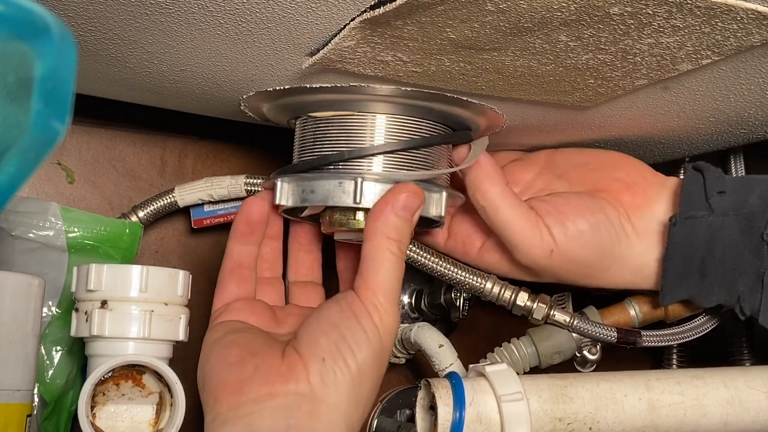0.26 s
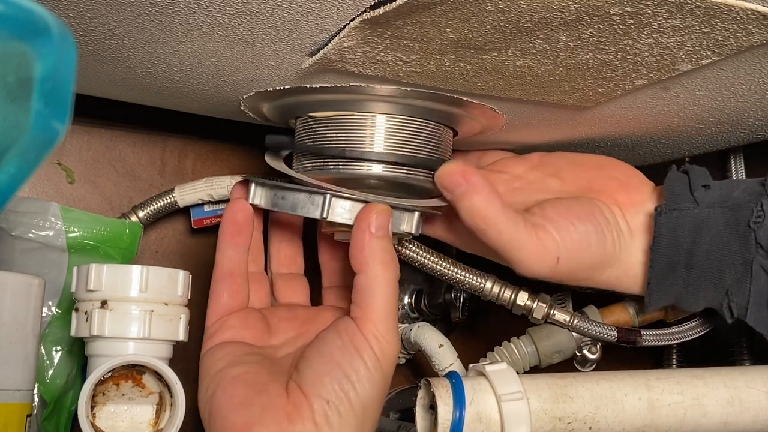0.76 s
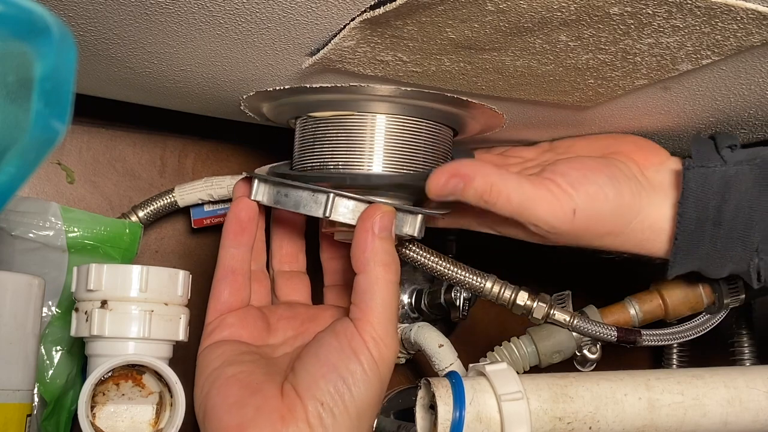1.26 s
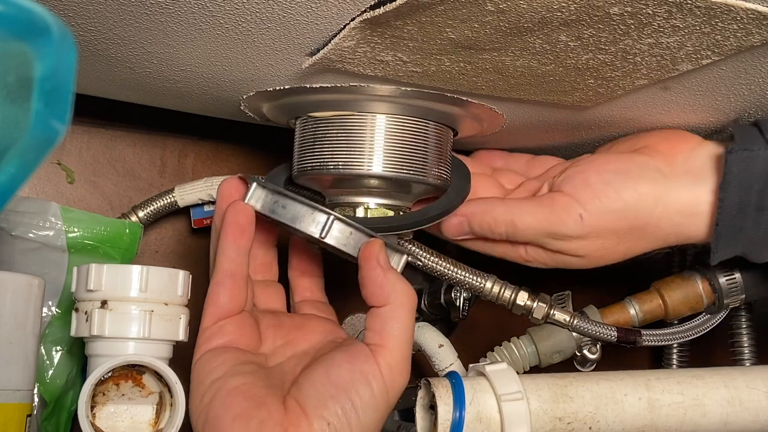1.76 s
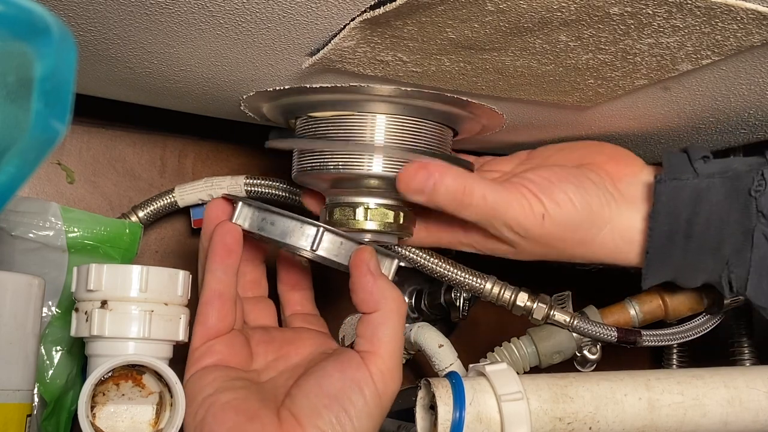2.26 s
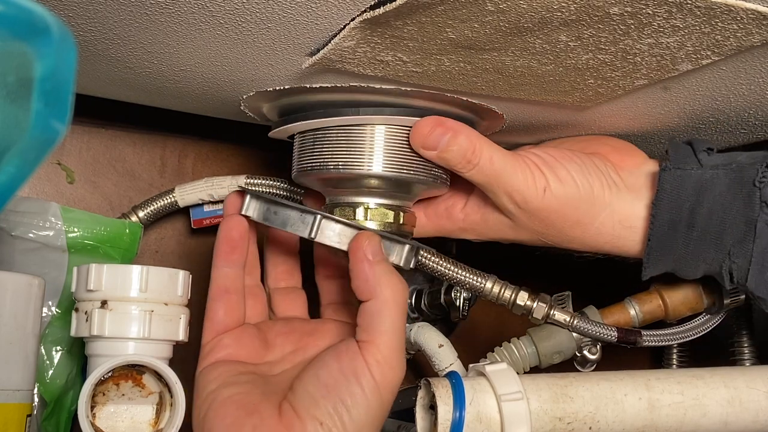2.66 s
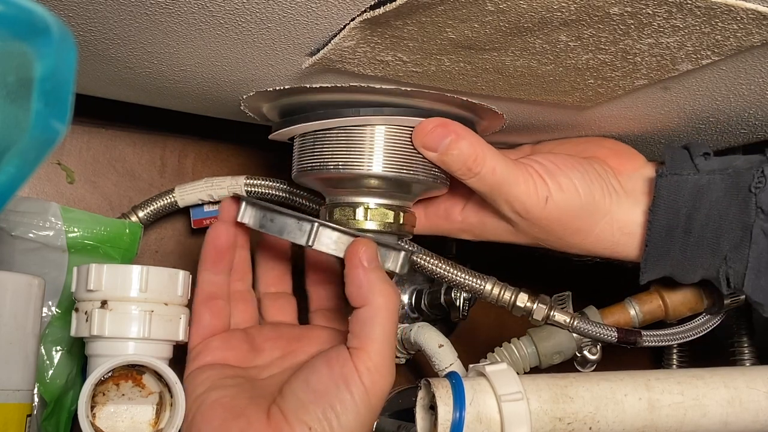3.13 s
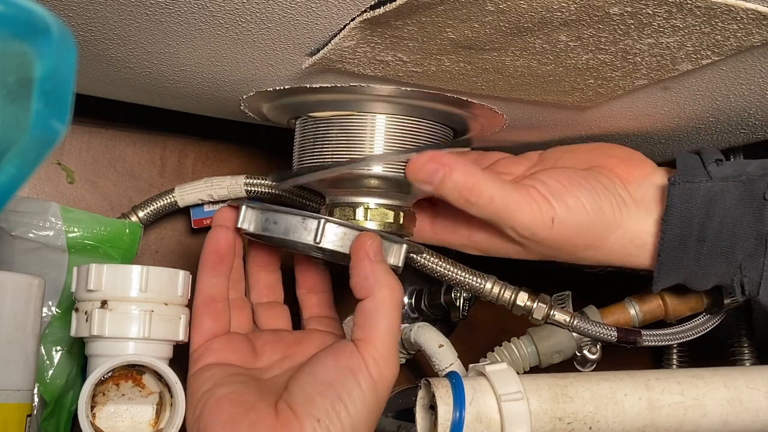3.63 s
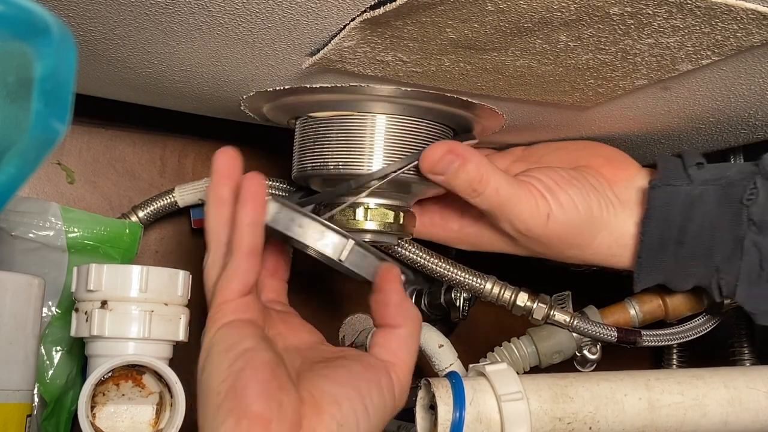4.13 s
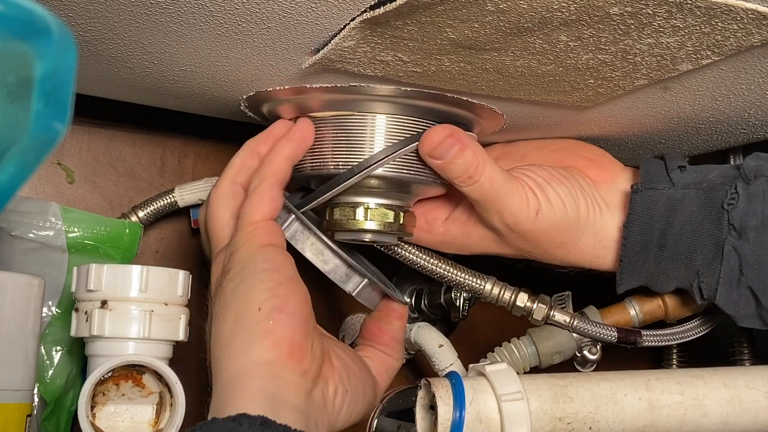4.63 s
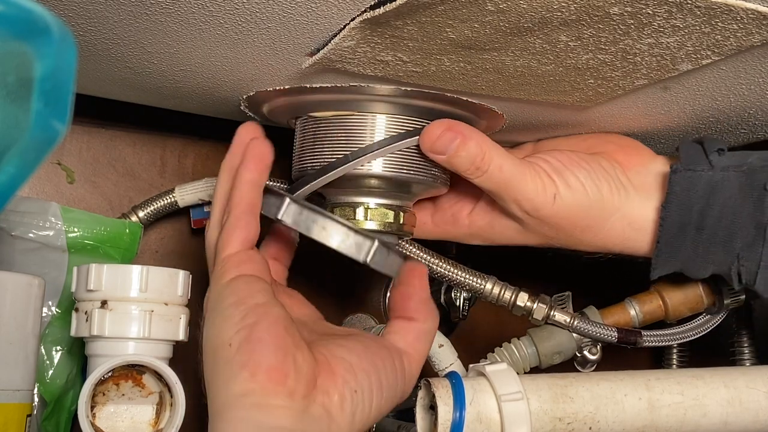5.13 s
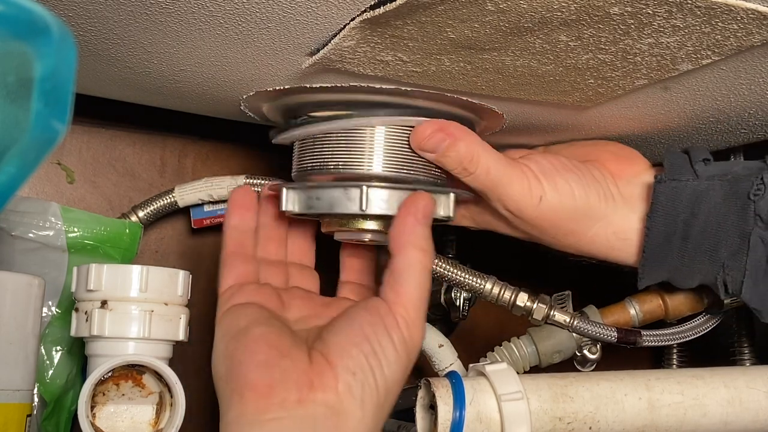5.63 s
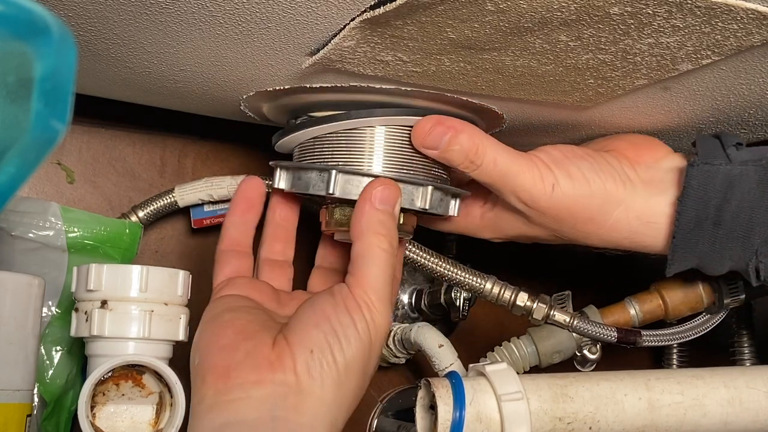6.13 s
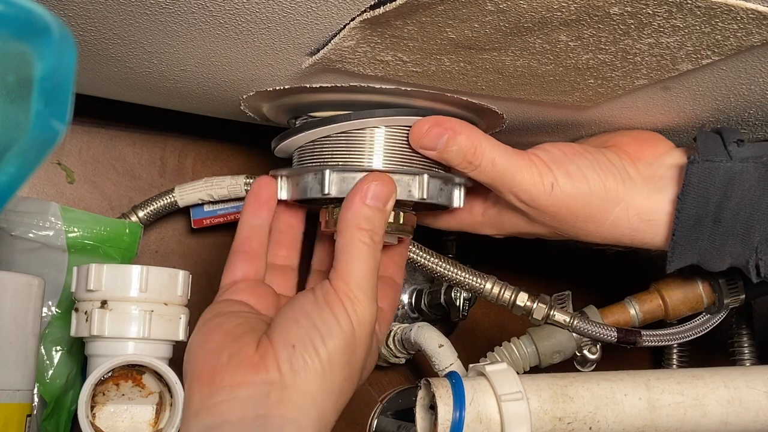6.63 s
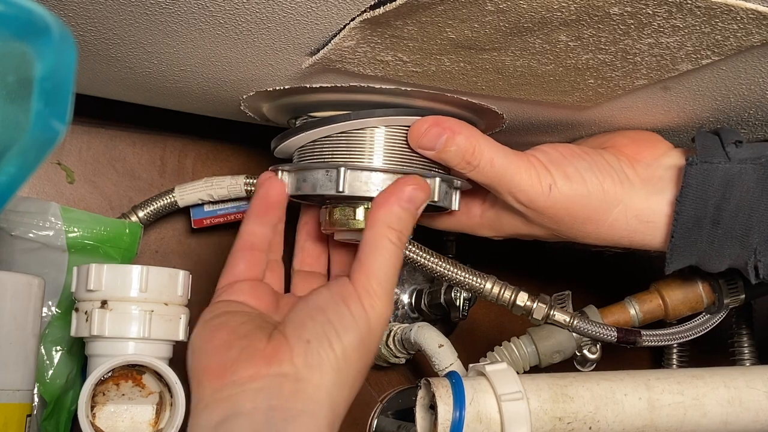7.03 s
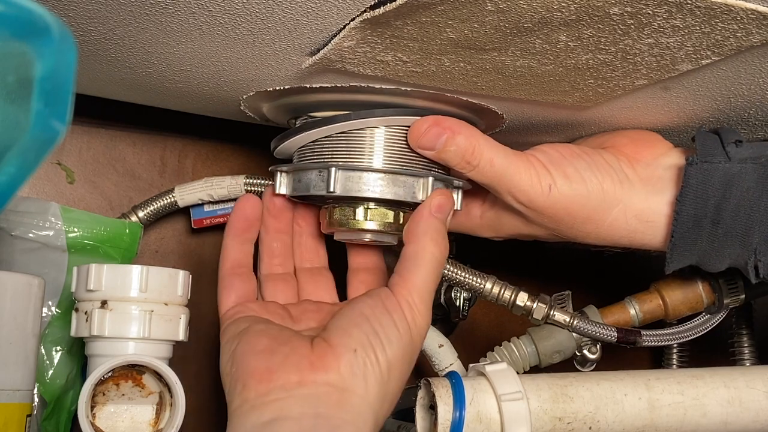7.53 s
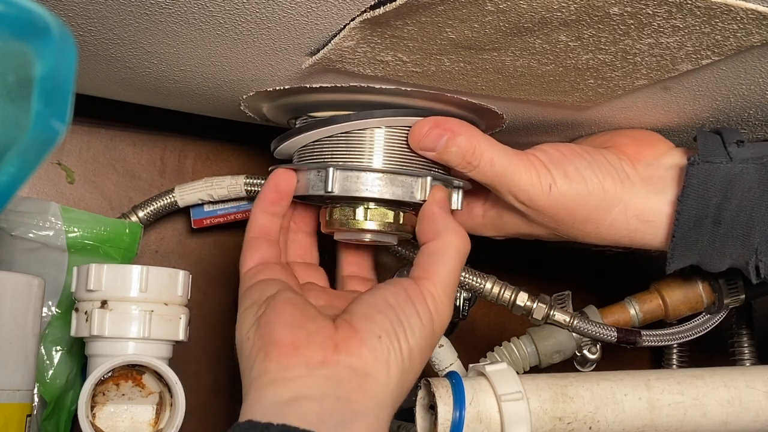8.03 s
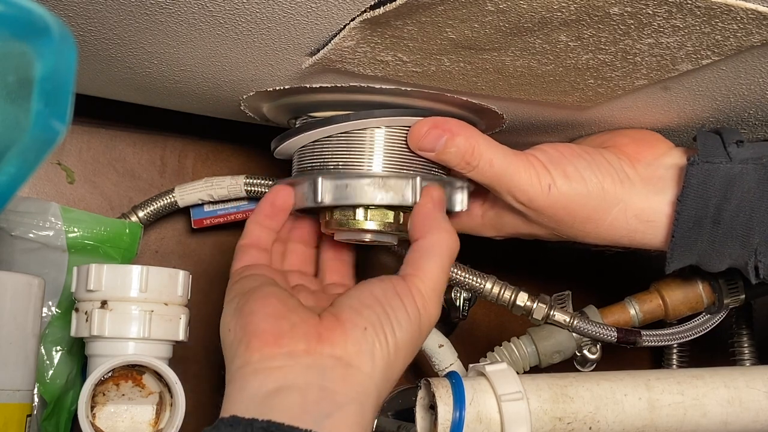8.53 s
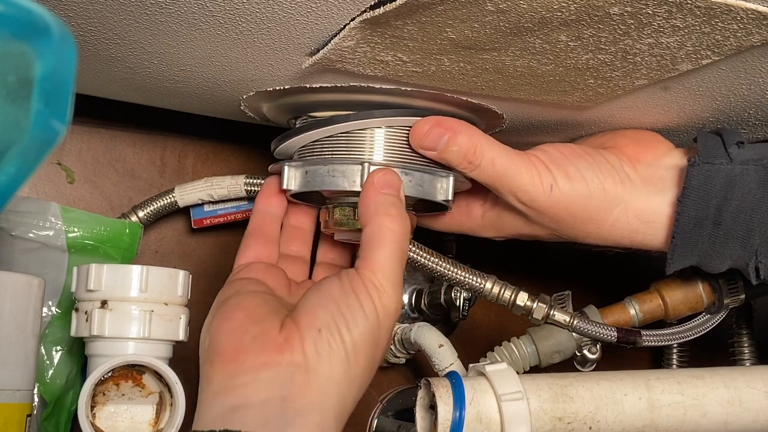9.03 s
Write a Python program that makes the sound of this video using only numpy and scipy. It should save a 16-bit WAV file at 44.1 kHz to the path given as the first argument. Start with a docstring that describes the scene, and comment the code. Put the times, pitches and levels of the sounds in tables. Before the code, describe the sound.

Close stereo sound from inside a cabinet under a steel sink, with very faint low room rumble and a short boxy echo. A soft tap and a moderate clack come within the first 0.2 s, then a knock with a low bowl boom and rubber scrape at 0.5. Rasps and light sliding follow; from 1.2 to 1.7 several duller clacks mix with rubbery drags. Small ticks and rasps come at 2.1-2.4, a clack with grinding and dragging at 2.6, another at 3.3. From 3.7 to 5.2 it is quiet: faint brushing, thin metallic singing, tiny taps. Hard bright clacks burst out at 5.3, 5.65 and 5.96, with brief ringing and scrapes. Around 6.4-6.9 knocks mingle with groaning rubber. Only light slides and small ticks remain until 8.35, when a dense rattle starts, with strong hits at 8.66 and 9.01, the latter booming, and a last faint tap at 9.26.

```python
"""Inside a cabinet under a steel sink, heard close up on two microphone ports over a faint room rumble.
Two hands lean on the bowl and work a rubber washer and a cast metal locknut onto the drain strainer:
nut clacks, booms and rasps at first, then lighter brushing, sliding and singing around 4 to 5 s.
The hardest clacks follow from 5.3 s, with groans as the washer grips; a last dense bout starts near 8.4 s.
Blows ring decaying modes and noise bursts; rubs are random tiny catches; the cabinet adds an echo."""
import sys
import numpy as np
from scipy import signal
from scipy.fft import rfft, irfft, next_fast_len
from scipy.io import wavfile
from scipy.ndimage import map_coordinates

SR = 44100
rng = np.random.default_rng(int(sys.argv[2]) if len(sys.argv) > 2 else 0)


def bounce(signal):
    """Save signal as a 16-bit WAV file at the path given by the first command-line argument."""
    frames = np.transpose(np.atleast_2d(signal))
    limited = np.clip(frames, -1, 1)
    pcm = np.round(limited * 32767).astype(np.int16)
    wavfile.write(sys.argv[1], SR, pcm)


N = 409248

# modes of the strainer in its sheet of steel: (frequency [Hz], relative level [dB], t60 [s])
STRAINER = [(408, -6.5, 0.32), (489, -13, 0.23), (499.4, 7.5, 0.069), (574, -7, 0.22), (630, -10, 0.16),
            (757, -11.5, 0.13), (817.4, 1.5, 0.1)]
# modes of the bowl's walls: (frequency [Hz], relative level [dB], t60 [s])
WALL = [(208.9, 3.5, 0.26), (226.2, -14, 0.72), (284, -7, 0.29), (332.1, 1.5, 0.2)]
# modes of the nut, damped by the fingers: (frequency [Hz], relative level [dB], t60 [s])
NUT = [(4100, 4, .11), (4470, -1, .09), (4750, -7, .06), (4965, -2, .1), (5450, -5, .05), (5650, -3, .07),
       (6100, -6, .05), (6425, -2, .1), (6600, 1, .11)]
# the nut's highest modes, woken by a sharp edge or by skin sliding over the metal: (frequency [Hz], relative
# level [dB], t60 [s])
EDGE = [(7945, -2, .08), (8125, 0, .09), (9410, -3, .06), (9910, -6, .06), (11300, -11, .06),
        (11605, -8, .07), (12000, -10, .07), (13500, -7, .05), (14250, -12, .05)]
# colour of a dull knock: (frequency [Hz], relative level [dB])
KNOCK = [(90, -38.5), (200, -10.5), (550, 2.5), (720, -9), (850, -8.5), (1100, -22.5), (2500, -57.5)]
# colour of the nut grinding on a thread: (frequency [Hz], relative level [dB])
GRIND = [(600, -11.5), (1000, 7), (1300, 2.5), (1800, 2), (2500, -2.5), (3600, -12.5), (4800, -7.5),
         (8000, -10.5), (16000, -30)]
# colour of light sliding over metal: (frequency [Hz], relative level [dB])
SLIDE = [(300, -30), (900, -7), (2000, -4), (3400, -12.5), (6500, -6), (9000, -11.5), (12000, -9),
         (16000, -9)]


def amp(db):
    """Decibels to a factor of amplitude."""
    return 10 ** (np.asarray(db) / 20)


def unit(x):
    """Scaled to rms 1."""
    return x / np.sqrt(np.mean(x ** 2) + 1e-20)


def along(points, hz):
    """A curve through (Hz, value) points, interpolated on a log frequency axis."""
    f, v = np.transpose(points)
    return np.interp(np.log(hz + 1), np.log(f + 1), v)


def filtered(x, response):
    """x times a response of frequency."""
    n = x.shape[-1]
    m = next_fast_len(n + SR // 8)
    spectrum = rfft(x, m) * response(np.fft.rfftfreq(m, 1 / SR))
    return irfft(spectrum, m)[..., :n]


def coloured(x, colour):
    """x weighted by a colour, at rms 1."""
    return unit(filtered(x, lambda hz: amp(along(colour, hz))))


def noise(n):
    """White noise, independent in mid and side."""
    return rng.standard_normal((2, n))


def wobble(rate):
    """A smooth random curve, rate knots a second."""
    knots = rng.standard_normal(int(N * rate / SR) + 4)
    return map_coordinates(knots, [np.arange(N) * rate / SR])


def add(track, s, sound):
    """Lay a sound into a track at time s."""
    place = track[:, round(s * SR):][:, :sound.shape[1]]
    place += sound[:, :place.shape[1]]


def ring(modes, t, scatter_db):
    """Decaying modes at new strengths and phases, starting near rms 1."""
    hz, db, t60 = np.transpose(modes)[:, :, None]
    size = amp(db + scatter_db * rng.standard_normal(db.shape))
    phase = 2 * np.pi * rng.random((2, len(modes), 1))
    decaying = size * amp(-60 * t / t60) * np.sin(2 * np.pi * hz * t + phase)
    return np.sum(decaying, axis=1) / np.sqrt(np.sum(size ** 2) / 2)


def resonating(x, modes):
    """x through a body's modes, at rms 1."""
    t = np.arange(SR // 4) / SR
    body = ring(modes, t, scatter_db=2.5) * (1 - np.exp(-t / 0.0005))
    return unit(signal.fftconvolve(x, body, axes=1)[:, :x.shape[1]])


def rub(n, surface, modes, rate, ring_db):
    """Friction of rms 1: rate tiny catches a second, heard directly and through the rubbed body's modes."""
    catches = (rng.random(n) < rate / SR) * noise(n)
    return unit(coloured(catches, surface) + amp(ring_db) * resonating(catches, modes))


def stroking(rows, attack, fade):
    """The gain of a series of rubs: each swells, holds and dies away (time constants in s)."""
    out, t = np.zeros((1, N)), np.arange(SR) / SR
    for s, length, db in rows:
        shape = (1 - np.exp(-t / attack)) * np.exp(-np.maximum(t - length, 0) / fade)
        add(out, s, amp(db) * shape[None])
    return out


def contacts():
    """Each contact cracks and rings the nut, knocks the strainer, then spreads into the bowl; harder is brighter."""
    # the nut strikes the strainer; hardness is low when a finger or the washer cushions it,
    # edge is high when a sharp corner lands: (time [s], force [dB], hardness [dB], edge [dB])
    blows = [(0.0504, -49, -7, -4), (0.165, -28, 8.5, -5), (0.4885, -31, 1, 1.5), (0.6561, -39, 14, -25),
             (1.176, -35, -5.5, -6), (1.398, -37, 8.5, -7), (1.5817, -39, -18.5, 10),
             (1.6677, -34.5, -12, 7), (1.6929, -32, -6.5, -2), (2.41, -52, 4, 3), (2.4321, -48.5, -2.5, -3),
             (2.6211, -37, 7.5, 0), (3.281, -34.5, 5, -3.5), (3.653, -63.5, 5, -8), (4.1665, -61.5, 4, 18),
             (4.3482, -52, -21, 6), (4.477, -54.5, -24, 8), (5.3085, -23.5, 2.5, 2),
             (5.4332, -38.5, -13, 5), (5.6418, -22, 18, -2), (5.6828, -34.5, 9, 3),
             (5.8221, -31.5, -2, 0.5), (5.9601, -23.5, 7.5, 4.5), (5.9891, -27.5, -2, -15),
             (6.5284, -30.5, -2, -2), (6.5791, -34.5, -7, 0), (6.7143, -42.5, 2, 5), (6.7284, -28, 2, -4.5),
             (6.7494, -24, 3.5, -0.5), (6.8432, -35, -10, 5), (6.9283, -29, -3, 4), (7.279, -53.5, -11, 15),
             (7.5015, -41.5, 0.5, 7), (8.3616, -31, -0.5, -1), (8.3858, -37.5, 6.5, 3),
             (8.41, -33, -3.5, 7), (8.4604, -35.5, -20, 8), (8.531, -50, 9.5, 12.5), (8.5934, -38, -9.5, 6),
             (8.6474, -33, -12, 5.5), (8.6585, -21, 4.5, -7), (8.9465, -41.5, -11.5, 7),
             (9.0131, -22.5, 14.5, 8), (9.262, -42.5, 2, 6)]
    # modes of the threaded barrel: (frequency [Hz], relative level [dB], t60 [s])
    barrel = [(1058, -2, .09), (1245, 1, .12), (1335, -2, .09), (1520, -2, .09), (1940, -4, .07),
              (2235, -4, .08), (2518, -6, .07), (2690, -6, .07), (2935, -4, .08)]
    # colour of the clack on the threads: (frequency [Hz], relative level [dB])
    clack_colour = [(500, -31), (950, 2), (1250, 6.5), (1750, -0.5), (2200, 1.5), (3000, -2.5),
                    (3700, -14.5), (5500, -43.5)]
    # colour of the nut's crack: (frequency [Hz], relative level [dB])
    crack_colour = [(2200, -25), (3800, -3), (4500, 5), (5600, 4.5), (7300, -4), (9000, -15), (16000, -48)]
    # colour of a sharp corner's tick: (frequency [Hz], relative level [dB])
    tick_colour = [(5500, -29), (8000, 9), (10500, -9), (13500, 1.5), (16000, -9)]

    out, t = np.zeros((2, N)), np.arange(SR // 3) / SR
    # the cabinet's near walls return each blow for a few milliseconds; then the crowded modes of thin steel die
    # as a noise
    after_hold = np.maximum(t - .004, 0)

    def burst(colour, t60):
        """A coloured noise that holds for a few milliseconds, then dies."""
        return coloured(noise(len(t)), colour) * amp(-60 * after_hold / t60)

    def struck(modes):
        """A body's modes set ringing by one blow."""
        return ring(modes, t, scatter_db=-1.5)

    def rise(seconds):
        """A part getting into motion."""
        return 1 - np.exp(-t / seconds)

    for s, force_db, hardness_db, edge_db in blows:
        # what each part takes of the blow, and what hardness adds to it
        clack_db = force_db + 9 + .6 * hardness_db
        ring_db = force_db - 15 + 1.21 * hardness_db
        ping_db = force_db - 19 + hardness_db + edge_db
        # the heavy bowl follows the force only partly, and a cushioned blow hardly reaches it
        boom_db = -10.5 + 0.7 * force_db + .25 * hardness_db

        clack = amp(clack_db) * (amp(-16) * burst(clack_colour, t60=0.084) + amp(-22) * struck(barrel))
        metal = amp(ring_db) * (amp(-1.5) * burst(crack_colour, t60=0.051) + amp(-7.5) * struck(NUT))
        ping = amp(ping_db) * (amp(-7.5) * burst(tick_colour, t60=.06) + struck(EDGE))
        knock = amp(force_db + 3.5) * (amp(-2.5) * burst(KNOCK, t60=0.14) + struck(STRAINER))
        wall = amp(force_db + 3) * struck(WALL)
        boom = amp(boom_db) * bowl_boom(t)

        # the bigger the part, the later it gets moving
        small_parts = (clack + metal + ping) * rise(0.00027)
        add(out, s, small_parts + knock * rise(0.0024) + wall * rise(0.015) + boom)

        # a very faint, short burst swells into each blow
        swell = burst(GRIND, t60=0.024)[:, :SR // 100][:, ::-1]
        add(out, s - swell.shape[1] / SR, amp(clack_db - 40) * swell)
    return out


def bowl_boom(t):
    """The bowl's slow modes swell and die away after a push."""
    # slow modes of the sink bowl: (frequency [Hz], relative level [dB], t60 [s])
    bowl = [(73.4, 5.5, 0.24), (105.7, -10.5, .3), (132.9, -3.5, 0.32)]
    return amp(7) * ring(bowl, t, scatter_db=1.5) * (1 - np.exp(-t / .011)) ** 2


def rebounds():
    """A nut that bounces free rings briefly like a small bell."""
    # the nut rebounds clear of the threads and a hoop mode rings on:
    # (time [s], frequency [Hz], level [dB], t60 [s])
    bounces = [(2.622, 4470, -50, .2), (5.961, 4100, -26, .06), (8.39, 4470, -45, .12),
               (8.41, 5650, -47, .1), (8.74, 4470, -52, .2)]
    out, t = np.zeros((2, N)), np.arange(SR // 4) / SR
    for s, hz, db, t60 in bounces:
        add(out, s, amp(db) * ring([(hz, 0, t60)], t, scatter_db=0))
    return out


def sliding_nut():
    """The nut grinds along the threads; when it hangs free, light brushing keeps its modes singing."""
    # the nut grinds along a thread: (time [s], length [s], level [dB])
    grinds = [(2.635, 0.106, -53.5), (5.5, 0.37, -53), (5.73, 0.041, -43), (5.985, 0.0084, -29),
              (6.362, 0.024, -50.5), (8.39, 0.14, -55.5), (8.57, 0.055, -52), (8.73, 0.08, -50),
              (9.003, 0.012, -47)]
    # the loosely held nut brushes the threads and sings: (time [s], length [s], relative level [dB])
    brushes = [(4.06, 0.16, -63), (4.24, 0.028, -54), (4.345, 0.022, -56), (4.42, 0.06, -61.5),
               (5.1, 0.38, -62)]
    # modes of the nut hanging free: (frequency [Hz], relative level [dB], t60 [s])
    free_nut = [(1600, -15, .16), (4100, -14, .07), (6270, -10, .05), (6600, 0, .09), (6730, -3, .05),
                (7100, -8, .03), (8000, -4, .04), (11300, -8, .03), (12000, -9, .03)]

    singing = amp(2 * wobble(40)) * rub(N, SLIDE, free_nut, rate=3000, ring_db=6)
    grinding = rub(N, GRIND, NUT, rate=2700, ring_db=-13.5)
    song = stroking(brushes, attack=.006, fade=.015) * singing
    return song + stroking(grinds, attack=.0025, fade=0.0075) * grinding


def washer():
    """Rubber drags and lets go in small jerks, the walls groan when it grips; its edge rasps on the threads."""
    # the rubber washer drags, sticks and slips: (time [s], length [s], relative level [dB])
    drags = [(0.0, 0.087, -52), (0.5, 0.037, -32), (0.61, 0.11, -43.5), (0.73, .22, -51.5),
             (1.185, 0.026, -31.5), (1.26, 0.094, -50.5), (1.34, 0.053, -46.5), (1.46, 0.08, -44.5),
             (1.582, 0.11, -39.5), (1.695, 0.026, -38), (2.1, 0.35, -63.5), (2.66, 0.11, -38.5),
             (2.8, 0.11, -58.5), (4.22, 0.26, -63), (4.85, 0.55, -63), (5.45, 0.43, -55),
             (5.78, 0.024, -38.5), (5.84, 0.13, -42), (5.975, 0.0073, -22), (6.366, 0.026, -35),
             (6.47, 0.093, -41), (6.708, 0.055, -37), (7.0, 0.019, -46.5), (7.05, .15, -59.5),
             (8.48, 0.11, -45), (8.74, 0.13, -37.5), (8.946, 0.043, -42.5)]
    # the washer grips and its judder makes the walls groan: (time [s], length [s], level [dB])
    groans = [(6.465, 0.145, -41), (6.712, 0.05, -31), (7.1, 0.088, -55), (8.65, 0.018, -39.5)]
    # the washer's edge rasps across the threads: (time [s], length [s], level [dB])
    rasps = [(0.61, 0.034, -49.5), (0.778, 0.025, -44.5), (0.9, 0.029, -54), (0.968, 0.0057, -49),
             (1.258, 0.026, -45.5), (2.091, 0.041, -50), (2.253, 0.062, -52), (2.291, 0.0184, -41.5),
             (2.86, 0.088, -69.5), (4.237, 0.037, -58.5), (7.275, 0.025, -53.5)]
    # colour of dragging rubber: (frequency [Hz], relative level [dB])
    rubber_colour = [(100, -40.5), (220, 11), (380, 11), (520, 7), (700, -10), (850, -8), (1200, -10.5),
                     (2500, -24.5), (6000, -34.5), (12000, -53)]
    # colour of the rasping edge: (frequency [Hz], relative level [dB])
    rasp_colour = [(400, -38), (1500, 3.5), (4500, 7.5), (7000, 8), (10000, 6), (16000, 1)]

    rubber = rub(N, rubber_colour, STRAINER, rate=1100, ring_db=-7)
    jerks = rub(N, KNOCK, STRAINER, rate=76, ring_db=1.5)
    edge = rub(N, rasp_colour, NUT, rate=3300, ring_db=-16)
    walls = resonating(noise(N), WALL)

    drag = stroking(drags, attack=.004, fade=0.014) * (amp(-1.5) * rubber + amp(-7) * jerks)
    groan = stroking(groans, attack=0.0055, fade=.03) * walls
    rasp = stroking(rasps, attack=.0025, fade=.004) * edge
    return drag + groan + rasp


def hands():
    """Shifting weight makes the bowl rumble, extra low booms join in, and skin slides unevenly over metal."""
    # the weight of the hands on the bowl: (time [s], relative level [dB])
    weight_on_bowl = [(0.0, -46.5), (0.49, -49), (0.75, -43.5), (1.06, -54.5), (1.55, -48), (2.07, -50.5),
                      (2.56, -52), (2.94, -56.5), (4.06, -57.5), (4.24, -52.5), (5.09, -52.5), (5.86, -42),
                      (6.33, -55.5), (6.8, -39.5), (7.18, -56), (7.91, -55.5), (8.66, -50.5), (9.28, -48.5)]
    # extra low booms of the bowl, alone or together with a blow: (time [s], relative level [dB])
    extra_booms = [(0.495, -26), (0.767, -38), (0.901, -36.5), (2.4319, -34.5), (3.7303, -37.5),
                   (4.347, -39.5), (4.48, -41.5), (5.6844, -29.5), (6.373, -35), (6.578, -32), (7.11, -38),
                   (7.36, -40.5), (8.8, -34.5), (9.032, -24.5)]
    # fingers slide over the metal: (time [s], length [s], relative level [dB])
    slides = [(0.04, .1, -54.5), (0.22, .26, -63), (0.52, .18, -56), (0.82, .32, -58.5), (1.16, .13, -56),
              (1.45, .38, -64), (2.1, .28, -65), (4.24, .26, -66.5), (4.62, .09, -65.5), (4.83, .22, -64.5),
              (5.3, .65, -64.5), (6.15, .05, -65.5), (6.89, .23, -61.5), (7.2, 0.053, -68),
              (7.42, .12, -65), (8.14, .1, -66.5)]
    # colour of the rumble under the hands: (frequency [Hz], relative level [dB])
    weight_colour = [(20, -25), (40, -9), (52, -6.5), (70, 6), (87, -11), (102, 3.5), (118, -17.5),
                     (134, -6), (165, -9), (210, -18), (300, -22), (700, -51.5)]

    s, weight_db = np.transpose(weight_on_bowl)
    rumble_db = np.interp(np.arange(N) / SR, s, weight_db) + 3.5
    out = amp(rumble_db) * coloured(noise(N), weight_colour)
    for s, db in extra_booms:
        add(out, s, amp(db) * bowl_boom(np.arange(SR // 3) / SR))
    skin = amp(1.3 * wobble(33)) * rub(N, SLIDE, NUT + EDGE, rate=9000, ring_db=-16)
    return out + stroking(slides, attack=0.0073, fade=0.026) * skin


def cabinet(x):
    """The echo of cabinet and kitchen: a noise tail in which each frequency dies at its own speed."""
    # decay of the echo: (frequency [Hz], t60 [s])
    decay = [(100, .3), (500, .35), (2000, .48), (6000, .42), (14000, .24)]
    hz, t, z = signal.stft(noise(SR // 2), SR, nperseg=256)
    dying = z * amp(-60 * t / along(decay, hz)[:, None])
    tail = signal.istft(dying, SR, nperseg=256)[1]
    tail *= 1 - np.exp(-np.arange(tail.shape[1]) / SR / 0.0027)
    return signal.fftconvolve(x, tail / np.linalg.norm(tail[0]), axes=1)[:, :N]


def room_tone():
    """The faint rumble of the room: steady coloured noise."""
    # colour of the room: (frequency [Hz], relative level [dB])
    room_colour = [(15, -26), (25, -6), (80, -5), (394, -15.5), (1100, -34), (2100, -34), (5000, -53.5),
                   (10000, -48.5), (16000, -49)]
    return amp(-61) * coloured(noise(N), room_colour)


def scene():
    """All sources as mid and side, then spread over left and right."""
    # how wide the sound stands between the ports: (frequency [Hz], gain of the side [dB])
    width = [(60, -20), (200, -16.5), (400, -9.5), (700, -3.5), (1200, -6.5), (1600, -3), (2200, -20),
             (6000, -37.5), (12000, -27)]
    work = contacts() + rebounds() + sliding_nut() + washer()
    mid, side = work + amp(-15.5) * cabinet(work) + hands() + room_tone()
    side = filtered(side, lambda hz: amp(along(width, hz)))
    return np.array([mid + side, mid - side])


def record(dry):
    """The ports differ in level; high treble reaches the right one first; deep bass and the very top are cut."""
    # level of the left port over the right: (frequency [Hz], difference [dB])
    tilt = [(100, 0.5), (400, 3), (750, 2.5), (1250, -1.5), (2200, 0)]
    # phase by which the left port leads: (frequency [Hz], lead [rad])
    lead = [(7400, 0), (7800, -1.3), (9000, -3.1), (11100, -6.3), (13300, -9.4), (16000, -13.3)]
    half = np.array([[.5], [-.5]])  # each port takes half of a difference

    def port_response(hz):
        """Level and phase of each port."""
        return amp(half * along(tilt, hz)) * np.exp(1j * half * along(lead, hz))

    ports = filtered(dry, port_response)
    low_cut = signal.butter(2, 36, "highpass", fs=SR, output="sos")  # Hz
    ports = signal.sosfilt(low_cut, ports)
    return filtered(ports, lambda hz: hz < 16100)


dry = scene()
out = record(dry)
bounce(out)
```